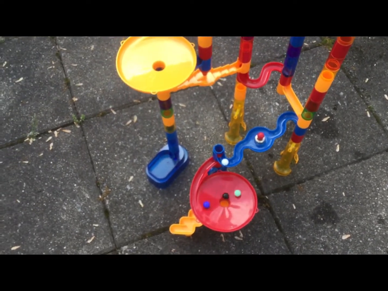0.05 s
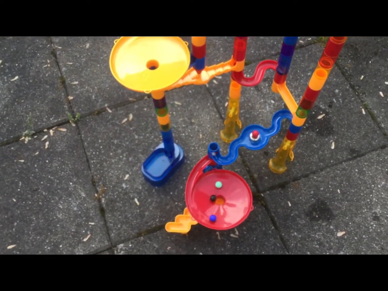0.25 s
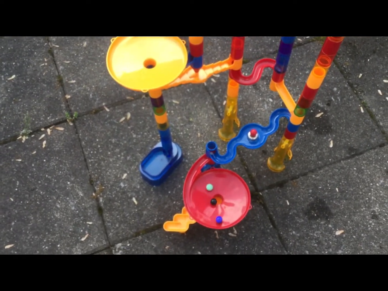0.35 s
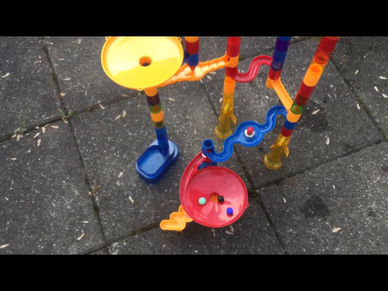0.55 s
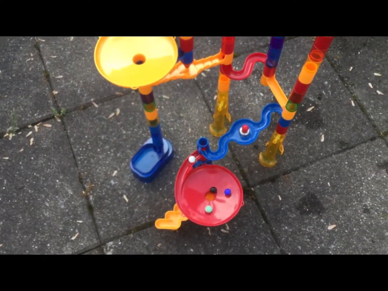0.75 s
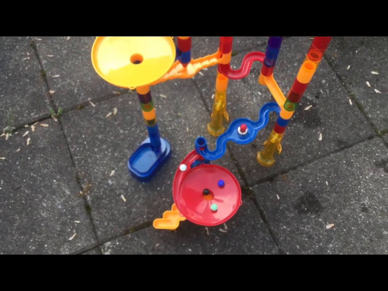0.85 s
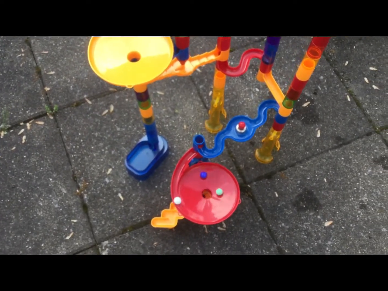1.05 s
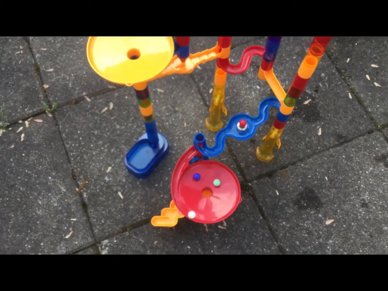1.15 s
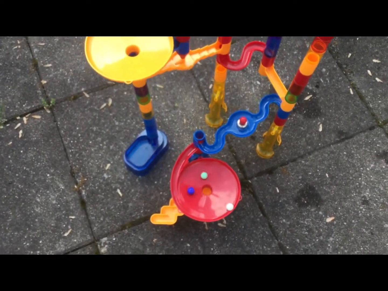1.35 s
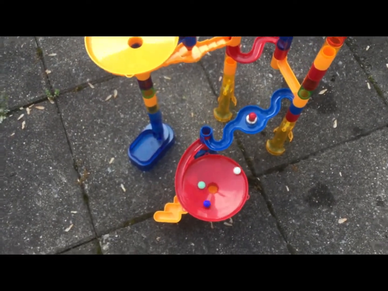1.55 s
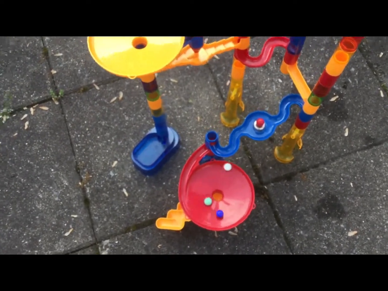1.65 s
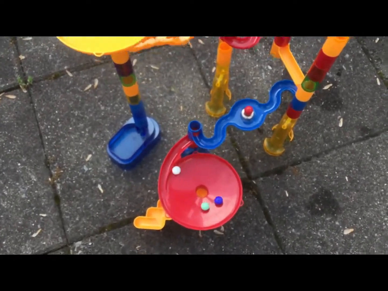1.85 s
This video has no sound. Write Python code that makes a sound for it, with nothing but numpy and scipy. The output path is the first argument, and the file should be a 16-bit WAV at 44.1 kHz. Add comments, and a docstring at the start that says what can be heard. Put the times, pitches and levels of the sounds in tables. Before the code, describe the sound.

A glass marble rolls along a plastic marble run, then bounces down a tube with quick, hollow clicks from about 0.2 to 0.5 seconds. Marbles roll softly in a funnel bowl. At about 1 second, one scrapes and rattles down a chute, knocking sharply into the bowl. They keep circling with scattered ticks until nearly 2 seconds. A faint outdoor rumble with a wavering low hum continues throughout.

```python
"""Marble run in a paved yard

A glass marble rolls along a wavy plastic track, drops through a connecting tube and bounces,
rattles down a chute and knocks into a funnel bowl, where it circles with two others, ticking
against the wall. Each knock rings the plastic's modes; rolling is a stream of tiny bumps that
shake it. A low outdoor rumble with two wavering hums lies underneath."""
import sys
import numpy as np
from scipy import signal
from scipy.fft import rfft, irfft
from scipy.io import wavfile

SR = 44100
rng = np.random.default_rng(int(sys.argv[2]) if len(sys.argv) > 2 else 0)


def generate_wav(signal):
    """Clip the signal to [-1, 1] and save it as 16-bit WAV at the path in sys.argv[1]."""
    frames = np.transpose(np.atleast_2d(signal))
    scaled = np.clip(frames, -1, 1) * 32767
    pcm = np.round(scaled).astype(np.int16)
    wavfile.write(sys.argv[1], SR, pcm)


N = 83790

# EQ curves of the outdoor bed and of the marble's travel: f/Hz, relative level/dB
RUMBLE_EQ = [(22, -68), (40, -25), (62, -1.5), (110, -2), (160, -2), (240, -11), (400, -23.5),
             (1000, -18.5), (4000, -48), (16000, -53)]
TRACK_EQ = [(450, -5.5), (630, 6.5), (980, -11), (1260, 5), (1470, -4), (1720, 3), (2000, -1), (2450, 2),
            (3200, -21), (4500, -15), (9000, -61)]
TICK_EQ = [(1200, -8), (3000, 2), (6000, -7), (8000, -18.5), (16000, -23)]
SCRAPE_EQ = [(500, -20), (1200, 7), (2100, 9), (4000, 1), (5800, -5), (7500, -2), (13000, -19),
             (16000, -23)]
# EQ curves of the low, middle and top layers of rolling in the bowl: f/Hz, relative level/dB
DRONE_EQ = [(200, -7), (330, -4.5), (470, -21), (660, 7), (830, -0.5), (980, -2), (1160, 3.5), (1450, -4.5),
            (1700, -1), (2100, -7.5), (2550, -4), (3500, -19), (8000, -38)]
GRIT_EQ = [(1000, -25), (2500, 7.5), (3100, 3.5), (4400, 7.5), (5800, -4), (7500, -12), (10000, -13),
           (16000, -33)]
HISS_EQ = [(4000, -37), (7500, 2), (10000, 1), (13500, 9.5), (16000, -8)]
# two low hums: f/Hz, rms waver/Hz
HUM_PITCHES = [(69, 6.1), (107, 8.34)]
# their faders, before trim: t/s, lower hum level/dB, upper hum level/dB
HUM_FADERS = [(0.0, -43, -66), (0.058, -62, -46), (0.518, -51, -64), (0.8, -54.5, -45.5),
              (1.052, -46.5, -48.5), (1.18, -53, -53.5), (1.264, -45.5, -47.5), (1.608, -42.5, -50),
              (1.64, -54.5, -65), (1.814, -42, -45.5), (1.9, -85, -60)]
# rolling along the wavy track: t/s, level/dB
TRACK_FADER = [(0, -51), (.23, -53.5), (.27, -74)]
# rolling in the bowl, before trims: t/s, drone level/dB, grit level/dB, hiss level/dB
ROLL_FADERS = [(0,-64,-57,-87), (.22,-52,-65,-72), (.33,-55,-49.5,-52), (.52,-53,-54,-63),
               (.63,-56.5,-70.5,-81), (.76,-57.5,-66,-77), (.86,-54,-59.5,-87), (.97,-47.5,-61.5,-93),
               (1.0,-45.5,-40.5,-74), (1.09,-44.5,-60,-56), (1.17,-49,-43,-44), (1.27,-49.5,-53,-70),
               (1.33,-45.5,-46,-54), (1.37,-48,-49,-65), (1.45,-46.5,-52.5,-63), (1.57,-47.5,-61.5,-83),
               (1.65,-49,-51.5,-59), (1.72,-45,-56,-52.5), (1.8,-46,-66,-77), (1.9,-46,-57,-71)]
# the chute scrape, harder until the marble shoots into the bowl: t/s, level/dB
SCRAPE_FADER = [(1.03, -58), (1.055, -38), (1.078, -32.5), (1.114, -35), (1.122, -62)]
# clear modes of each plastic part: f/Hz, relative level/dB, t60/s
TUBE_RESONANCES = [(829, -7.5, 0.14), (612, -4, 0.066), (1320, -8, 0.1), (1695, -11.5, 0.16),
                   (2090, -9.5, 0.12), (2266, -8, 0.047), (2630, -14, 0.081), (2897, -3, 0.047),
                   (3147, -6.5, 0.046), (3880, -8.5, 0.049), (4250, -5.5, 0.048), (4440, -6.5, 0.039),
                   (5370, -22, 0.049)]
BOWL_RESONANCES = [(630, -9.5, 0.078), (1202, -9, 0.095), (1277, -11, 0.083), (1631, -11.5, 0.08),
                   (1761, -3, 0.061), (2046, -11, 0.094), (2083, -13, 0.08), (2360, -14, 0.087),
                   (2530, -15, 0.18), (3028, -4.5, 0.052), (3544, -12.5, 0.076), (4033, -6.5, 0.043),
                   (4193, -10, 0.072), (5680, 3.5, 0.026)]
# EQ curves of their crowded, quickly damped modes: f/Hz, relative level/dB
TUBE_EQ = [(450, -16), (620, 1.5), (1000, -9), (1400, 3), (2200, 7), (3500, -3.5), (5400, 2.5),
           (7000, -5.5), (9500, -4), (12500, -4.5), (16000, -33)]
BOWL_EQ = [(450, -24), (630, -1), (900, -7.5), (1300, 4.5), (2400, 3), (3400, 0.5), (4400, -2.5),
           (5800, 2.5), (7200, -4.5), (12500, -2), (16000, -18)]
# tube hits: t/s, body, clack and snap drive level/dB, two wall f/Hz, two glassy f/Hz, hollow f/Hz
TUBE_CUES = [(0.2442, -43.5, -23, -24, 3960, 3090, 7860, 11900, 10160),
             (0.2792, -43, -34, -35, 2440, 5800, 9850, 6600, 8000),
             (0.2878, -36, -18.5, -23, 5510, 4220, 9860, 10800, 14100),
             (0.295, -34, -26.5, -27.5, 4250, 2870, 11800, 6700, 8360),
             (0.3803, -41.5, -24.5, -29, 5560, 2203, 9890, 12600, 12200),
             (0.393, -35.5, -32, -35.5, 4110, 2480, 8040, 9600, 10800),
             (0.4431, -41, -27, -31, 2920, 3850, 9130, 6660, 7800),
             (0.4804, -45, -32.5, -33, 3040, 3880, 13250, 8700, 11000)]
# chute and bowl hits: t/s, body, clack and snap drive level/dB, wall f/Hz, glassy f/Hz
BOWL_CUES = [(0.864, -50, -47, -58.5, 2545, 7950), (1.0413, -41, -33, -44, 1740, 9300),
             (1.051, -57, -32, -43, 2120, 7460), (1.0592, -59, -28.5, -44, 1680, 9250),
             (1.068, -41, -29.5, -63, 1794, 7500), (1.0759, -81, -23, -33, 5660, 12800),
             (1.083, -41, -28.5, -37, 5680, 8500), (1.088, -34, -31, -38, 4150, 9500),
             (1.0931, -41, -28.5, -34, 3560, 7250), (1.1055, -48, -29, -39, 2054, 7540),
             (1.111, -31, -33.5, -38.5, 1930, 14340), (1.1358, -23, -23, -27.5, 1627, 13260),
             (1.1438, -26.5, -22.5, -28, 4060, 7730), (1.1872, -25.5, -27.5, -43, 3023, 11500),
             (1.2079, -42, -38, -42.5, 2240, 11500), (1.225, -37.5, -38, -51, 1790, 10900),
             (1.29, -32.5, -32.5, -45, 2440, 8000), (1.31, -65, -36.5, -51, 4050, 10900),
             (1.323, -42, -38.5, -45, 2320, 7950), (1.3793, -27, -21, -33.5, 2440, 12000),
             (1.401, -38.5, -31.5, -46, 2080, 11000), (1.5241, -59, -38, -47.5, 2630, 9500),
             (1.602, -51, -41.5, -48.5, 5270, 12100), (1.6395, -42.5, -36.5, -51.5, 2630, 7600),
             (1.739, -43, -36.5, -51.5, 1636, 7130), (1.8523, -43, -37, -65.5, 1760, 7500)]

BODY_HZ, CLACK_HZ, SNAP_HZ = 1130, 3510, 10350  # where a hit's three drive levels apply
HOLD_S, DAMPING_SLOPE = 0.0015, 0.18  # higher modes die sooner
TAIL_DB, TAIL_T60_S = -13, 0.16  # afterglow of the crowded modes
WALL_DB, WALL_T60_S = -1, 0.054  # each spot hit favours a cluster of wall resonances
GLASS_DB, GLASS_T60_S = 2.5, 0.019  # and a high glassy one
SECOND_TONE_DB, NEIGHBOUR_DB, NEIGHBOUR_SPREAD = -2, -7.5, 0.0747  # spread as a share of the pitch
ECHO_DB, ECHO_T60_S = -16, 0.13  # the tones linger briefly in a reverberant tail
FULL_BLOW_DB, CLICK_DB, CLICK_T60_S, ATTACK_S = -37.5, 8.5, 0.0044, 0.0006  # a full blow's transient
CLICK_SOFTENING, ATTACK_SOFTENING = 0.22, 0.35  # gentler hits click less, rise slower: dB per dB of snap


def from_db(db):
    """Decibels to gain."""
    return 10 ** (np.asarray(db) / 20)


def rms_one(x):
    """Scale to rms 1."""
    return x / np.sqrt(np.mean(x ** 2) + 1e-20)


def at_hz(eq, hz):
    """Read an EQ curve on a log-frequency axis."""
    f, db = np.transpose(eq)
    return np.interp(np.log(hz + 1e-9), np.log(f), db)


def equalised(x, eq):
    """Shape a signal with an EQ curve; rms 1."""
    return rms_one(irfft(rfft(x) * from_db(at_hz(eq, np.fft.rfftfreq(N, 1 / SR))), N))


def faders(rows):
    """Straight ramps between breakpoints; one curve per level column."""
    s, *columns = np.transpose(rows)
    return [np.interp(np.arange(N) / SR, s, c) for c in columns]


def low_cut(x, hz):
    """Fourth-order high-pass."""
    return signal.sosfilt(signal.butter(4, hz, "high", fs=SR, output="sos"), x)


def add(out, s, sound):
    """Mix a sound in at its cue."""
    start = int(s * SR)
    out[start:start + len(sound)] += sound[:N - start]


def ring(clicks, hz, t60):
    """One mode: a unit click sets a sine of height 1 ringing."""
    r, w = from_db(-60 / (t60 * SR)), 2 * np.pi * hz / SR
    return signal.lfilter([0, np.sin(w)], [1, -2 * r * np.cos(w), r * r], clicks + 1e-18)


def outdoors(rumble_db=-49.5, hum_trim_db=0.5):
    """The bed: distant rumble with two wavering low hums."""
    out = from_db(rumble_db) * equalised(rng.standard_normal(N), RUMBLE_EQ)
    for (hz, waver_hz), level_db in zip(HUM_PITCHES, faders(HUM_FADERS)):
        waver = equalised(rng.standard_normal(N), [(10, 0), (300, -90)])
        hum = np.sin(2 * np.pi * np.cumsum(hz + waver_hz * waver) / SR)
        out += from_db(level_db + hum_trim_db) * rms_one(hum)
    return out


def bumps(per_s=1200, t60=0.028, spread_db=2.0):
    """Tiny uneven contacts of rolling marbles, each briefly shaking one of six spots on the plastic."""
    sizes = from_db(spread_db * np.minimum(rng.exponential(1, N), 4)) * rng.choice([-1, 1], N)
    clicks = sizes * (rng.random(N) < per_s / SR)
    spot = rng.integers(6, size=N)
    t = np.arange(SR // 10) / SR
    shakes = rng.standard_normal((6, len(t))) * from_db(-60 * t / t60)
    return sum(signal.fftconvolve(clicks * (spot == k), shake)[:N] for k, shake in enumerate(shakes))


def track():
    """The marble rolls along the wavy track, ticking against its bends, until it drops into the tube."""
    level_db, = faders(TRACK_FADER)
    ticks = from_db(-4.5) * equalised(bumps(per_s=190, t60=0.026), TICK_EQ)
    return from_db(level_db) * (equalised(bumps(), TRACK_EQ) + ticks)


def bowl_roll():
    """Rolling bumps make the bowl drone in its modes, with grit and a fine hiss on top."""
    drone_db, grit_db, hiss_db = faders(ROLL_FADERS)
    shake = bumps()
    drone = equalised(shake, DRONE_EQ)
    rings = rms_one(sum(from_db(db) * ring(drone, hz, t60) for hz, db, t60 in BOWL_RESONANCES))
    return (from_db(drone_db - 1.5) * drone
            + from_db(drone_db - 8.5) * rings
            + from_db(grit_db - 4) * equalised(shake, GRIT_EQ)
            + from_db(hiss_db - 4.5) * equalised(shake, HISS_EQ))


def chute_scrape():
    """Dense contacts of a marble pressed against the curved wall."""
    s, db = np.transpose(SCRAPE_FADER)
    swell = np.interp(np.arange(N) / SR, s, from_db(db), left=0, right=0)
    return swell * equalised(bumps(), SCRAPE_EQ)


def air_column():
    """The first hit sets the tube's air ringing on a hollow note."""
    entry = np.arange(N) == int(TUBE_CUES[0][0] * SR)
    return from_db(-37.5) * ring(entry, hz=830, t60=0.18)


def crowded_modes(t, drive, eq, t60):
    """The plastic clack: third-octave clusters of modes in random phase; t60 holds at CLACK_HZ."""
    edges = np.geomspace(180, 18000, 21)
    centres = np.sqrt(edges[:-1] * edges[1:])
    hz = np.fft.fftfreq(len(t), 1 / SR)
    inside = (hz >= edges[:-1, None]) & (hz < edges[1:, None])
    bands = np.fft.ifft(inside * np.exp(2j * np.pi * rng.random(len(t))))
    waves = np.cos(np.angle(bands)) * np.sqrt(4 * np.diff(edges) / SR)[:, None]  # even strength
    life = (CLACK_HZ / np.maximum(centres, BODY_HZ)[:, None]) ** DAMPING_SLOPE
    fall = from_db(-60 * np.maximum(t - HOLD_S, 0) / (t60 * life))
    tail = from_db(TAIL_DB - 60 * t / (TAIL_T60_S * life))
    return from_db(at_hz(eq, centres) + at_hz(drive, centres)) @ (waves * np.hypot(fall, tail))


def spot_tones(clack, snap, walls_hz, glasses_hz):
    """Wall and glassy tones of the spot hit, with a neighbour either side of the first wall tone."""
    tones = [(f, clack + WALL_DB + k * SECOND_TONE_DB, WALL_T60_S) for k, f in enumerate(walls_hz)]
    tones += [(f, snap + GLASS_DB + k * SECOND_TONE_DB, GLASS_T60_S) for k, f in enumerate(glasses_hz)]
    for side in (-1, 1):
        detune = side * NEIGHBOUR_SPREAD * (.5 + rng.random())
        tones.append((walls_hz[0] * (1 + detune), clack + WALL_DB + NEIGHBOUR_DB, WALL_T60_S))
    return tones


def knock(body, clack, snap, walls_hz, glasses_hz, modes, eq, crowd_db, t60, ring_db):
    """Glass on plastic: a bright click, a short clack, ringing tones and their brief reverberant tail."""
    t = np.arange(SR // 4) / SR
    drive = [(BODY_HZ, body), (CLACK_HZ, clack), (SNAP_HZ, snap)]
    crowd = from_db(crowd_db) * crowded_modes(t, drive, eq, t60)
    tones = [(f, ring_db + db + at_hz(drive, f) + rng.normal(0, 1.8), decay) for f, db, decay in modes]
    tones += spot_tones(clack, snap, walls_hz, glasses_hz)
    ringing = sum(from_db(db - 60 * t / decay) * np.sin(2 * np.pi * (f * t + rng.random()))
                  for f, db, decay in tones)
    reverb = rng.standard_normal(len(t)) * from_db(-60 * t / ECHO_T60_S) * (t > t60 / 2)
    echo = from_db(ECHO_DB) * signal.fftconvolve(ringing, reverb / np.linalg.norm(reverb))[:len(t)]
    click_db = snap + CLICK_DB + CLICK_SOFTENING * (snap - FULL_BLOW_DB)
    click = np.gradient(rng.choice([-1., 1.], len(t))) * from_db(click_db - 60 * t / CLICK_T60_S)
    attack_s = ATTACK_S * from_db(ATTACK_SOFTENING * max(FULL_BLOW_DB - snap, 0))
    hit = (crowd + ringing + echo + click) * np.minimum(t / attack_s, 1)
    return low_cut(hit, hz=466)  # the small parts radiate no bass


def tube_bounces():
    """The marble bounces down the tube; modes with a node at the spot hit leave a hollow in the treble."""
    out = np.zeros(N)
    for s, body, clack, snap, *tones_hz, hollow_hz in TUBE_CUES:
        hit = knock(body, clack, snap, tones_hz[:2], tones_hz[2:], TUBE_RESONANCES, TUBE_EQ,
                    crowd_db=7.5, t60=0.021, ring_db=0.5)
        add(out, s, signal.lfilter(*signal.iirnotch(hollow_hz, Q=8.7, fs=SR), hit))
    return out


def bowl_knocks():
    """Marbles knock against the chute and the wall of the bowl."""
    out = np.zeros(N)
    for s, body, clack, snap, wall_hz, glass_hz in BOWL_CUES:
        hit = knock(body, clack, snap, [wall_hz], [glass_hz], BOWL_RESONANCES, BOWL_EQ,
                    crowd_db=7, t60=0.029, ring_db=0)
        add(out, s, hit)
    return out


def scene():
    """Mono mix of the marble's journey over the outdoor bed."""
    marbles = track() + air_column() + tube_bounces() + chute_scrape() + bowl_knocks() + bowl_roll()
    return (marbles + outdoors())[None]


def record(dry, low_cut_hz=20, high_cut_hz=16200):
    """The microphone loses the deep bass; the top is cut steeply."""
    high_cut = signal.ellip(10, .3, 80, high_cut_hz, fs=SR, output="sos")
    return signal.sosfilt(high_cut, low_cut(dry, low_cut_hz))


dry = scene()
out = record(dry)
generate_wav(out)
```